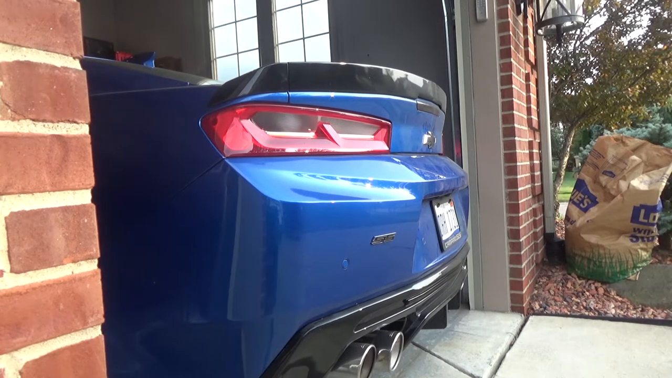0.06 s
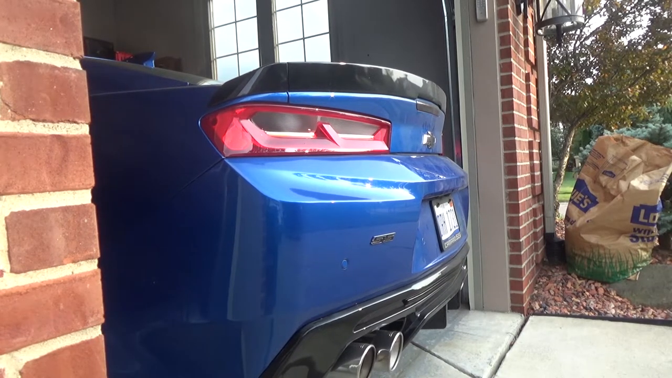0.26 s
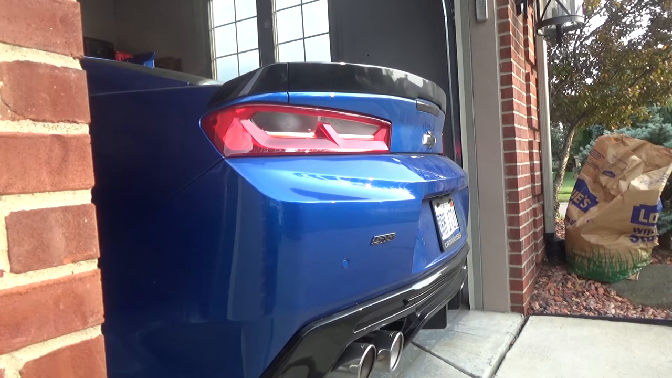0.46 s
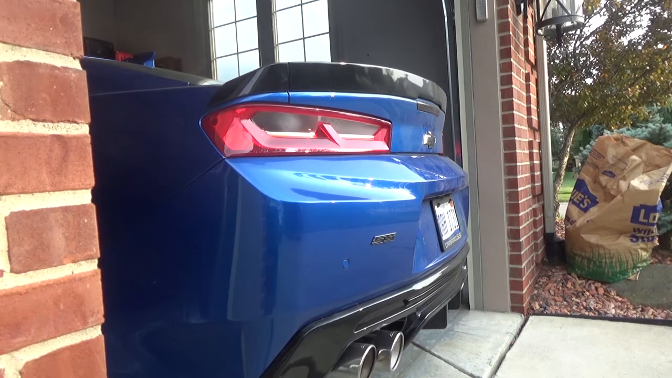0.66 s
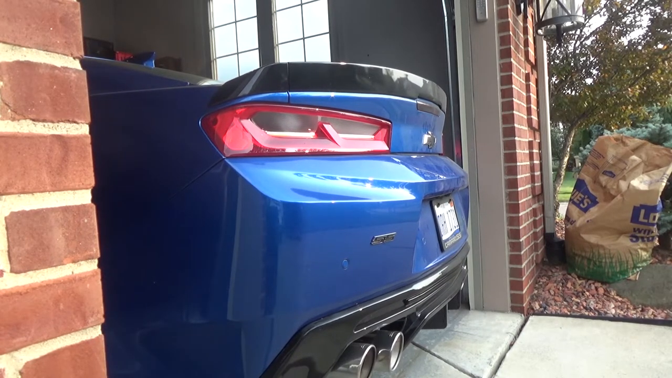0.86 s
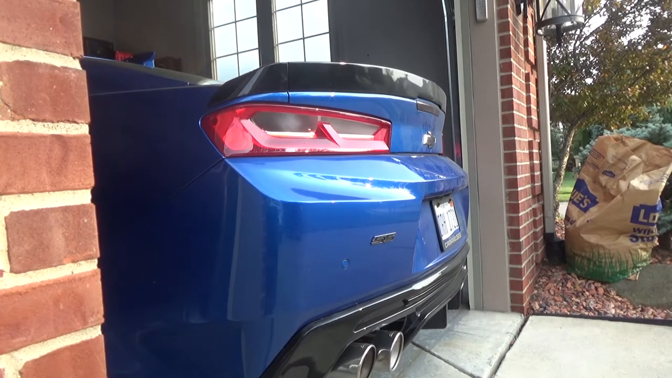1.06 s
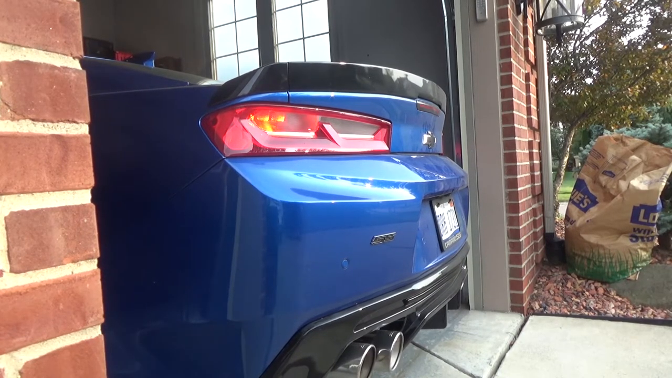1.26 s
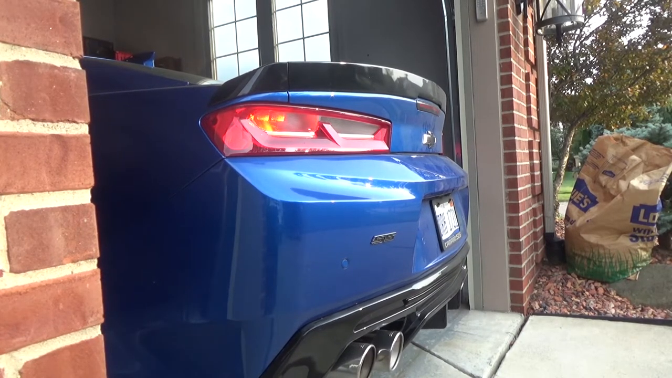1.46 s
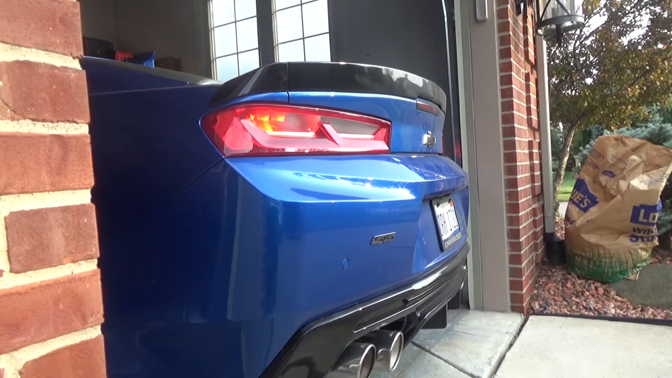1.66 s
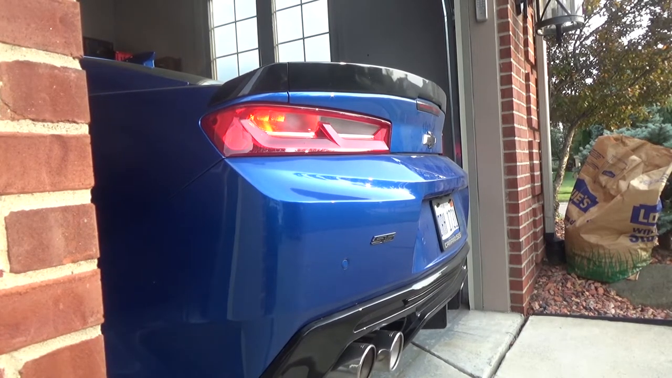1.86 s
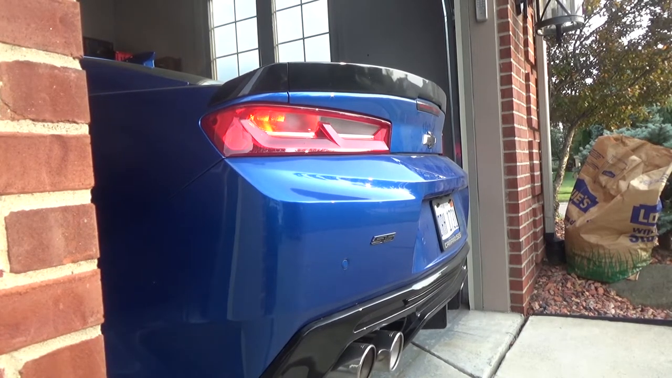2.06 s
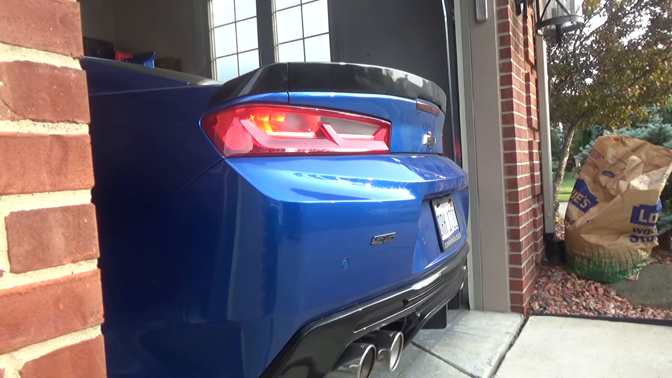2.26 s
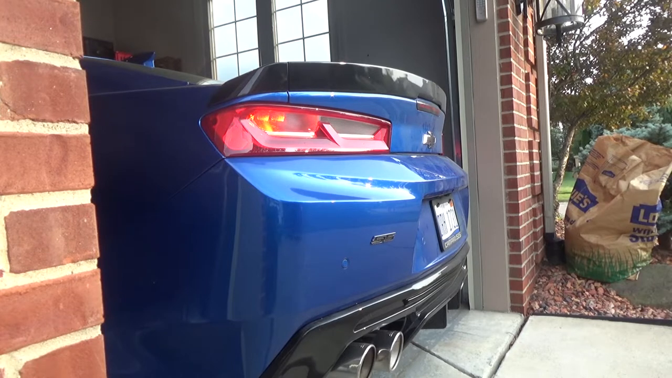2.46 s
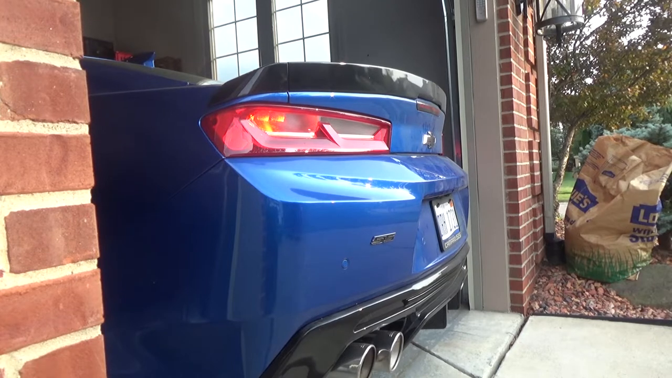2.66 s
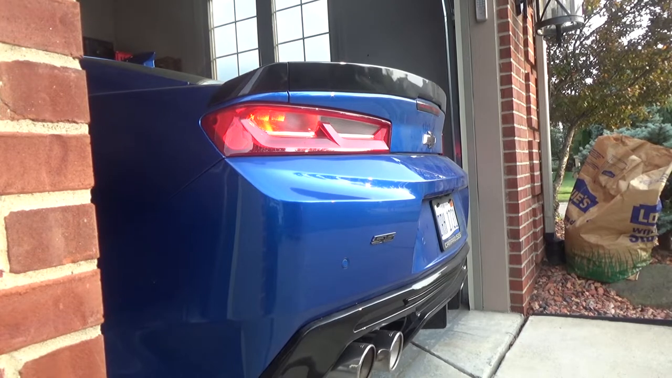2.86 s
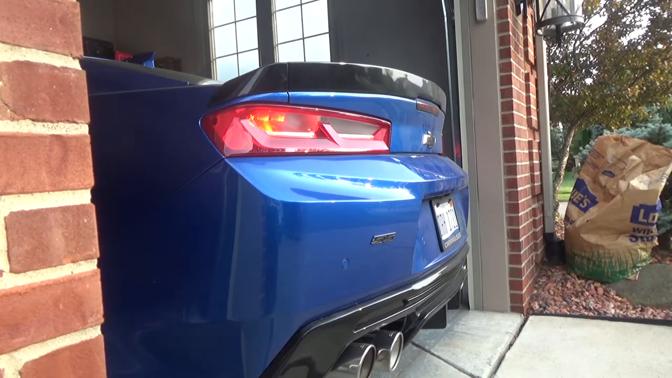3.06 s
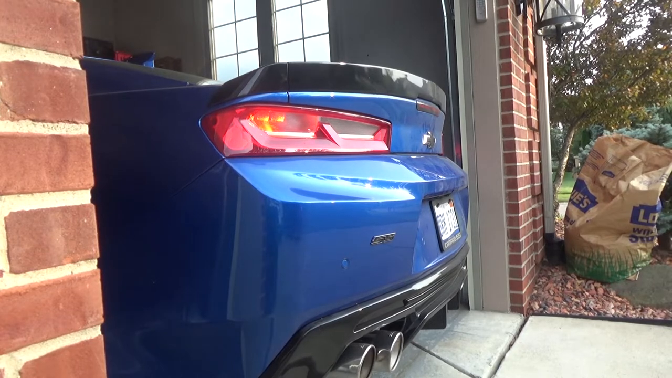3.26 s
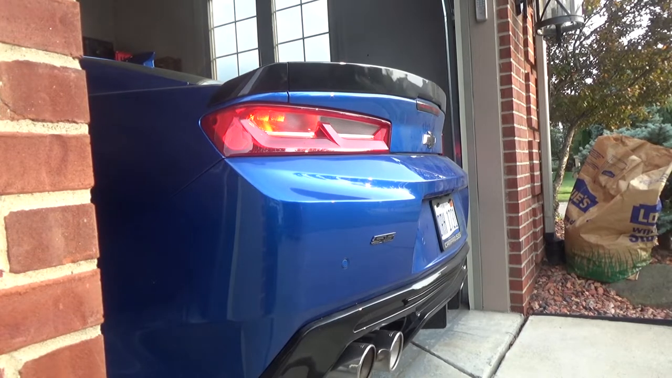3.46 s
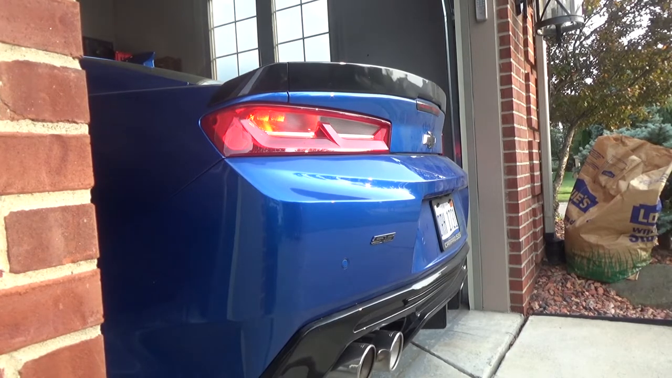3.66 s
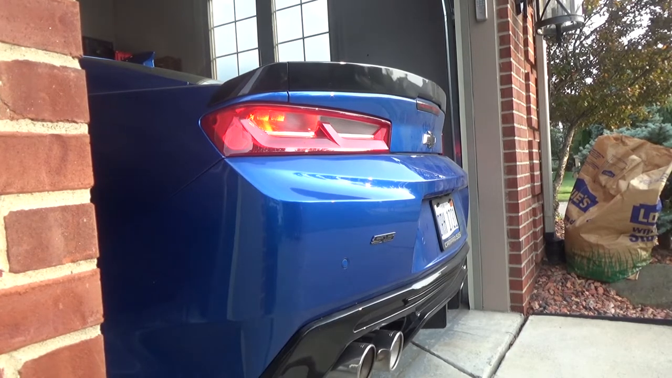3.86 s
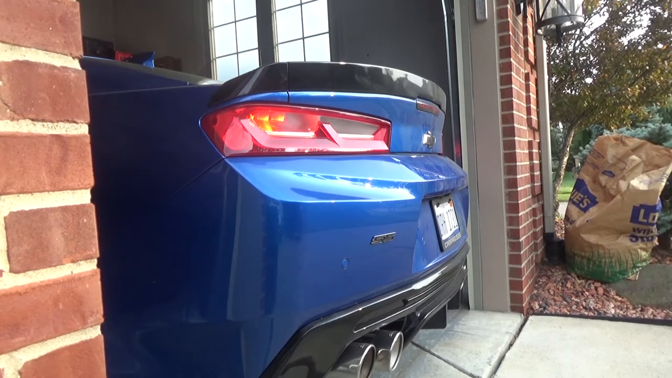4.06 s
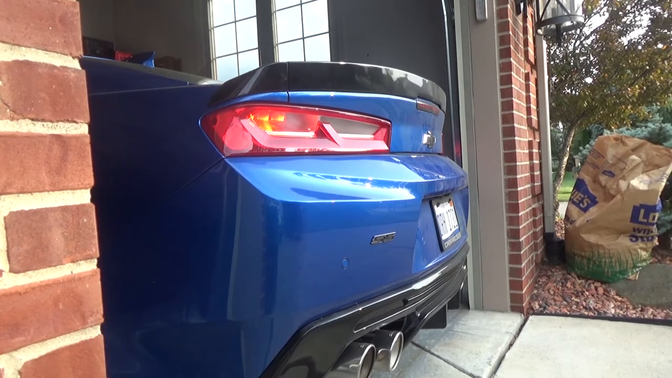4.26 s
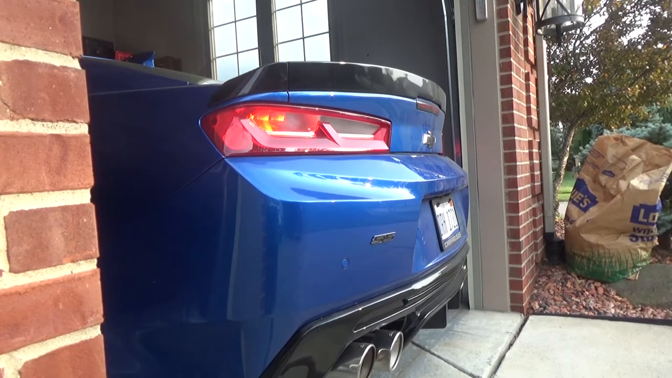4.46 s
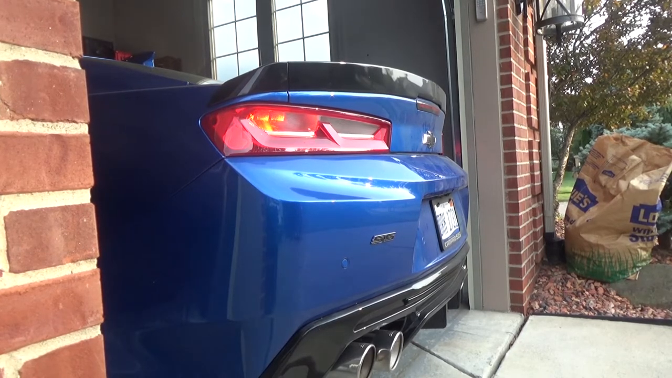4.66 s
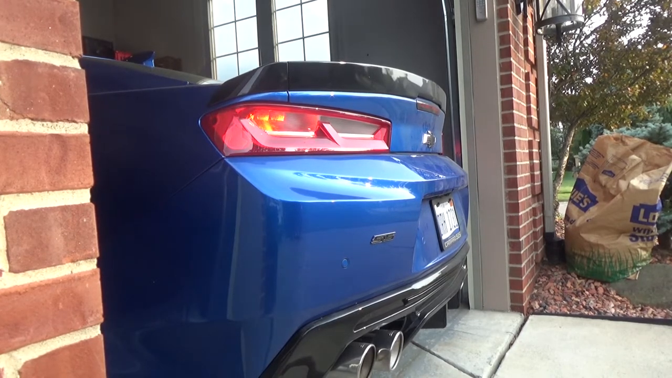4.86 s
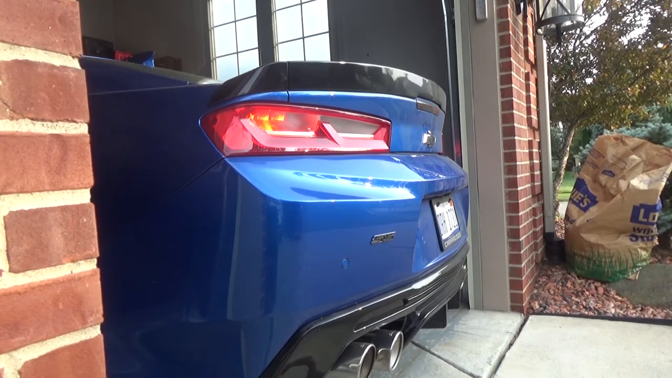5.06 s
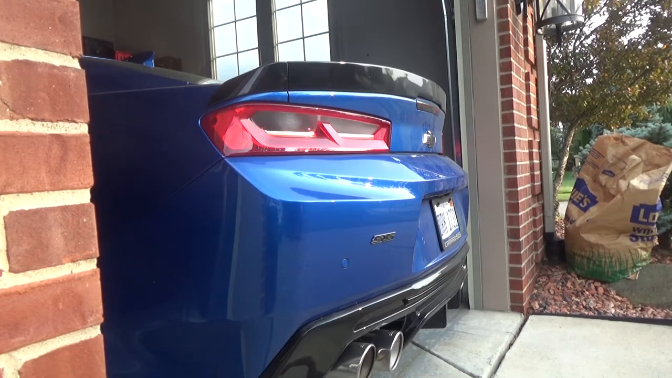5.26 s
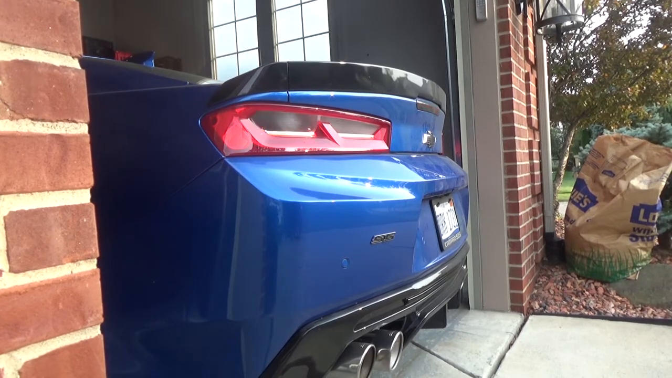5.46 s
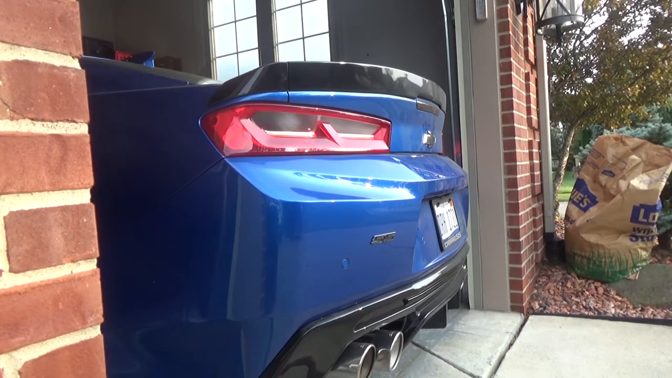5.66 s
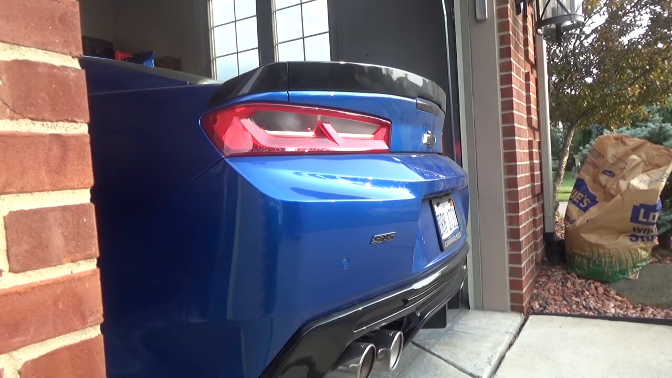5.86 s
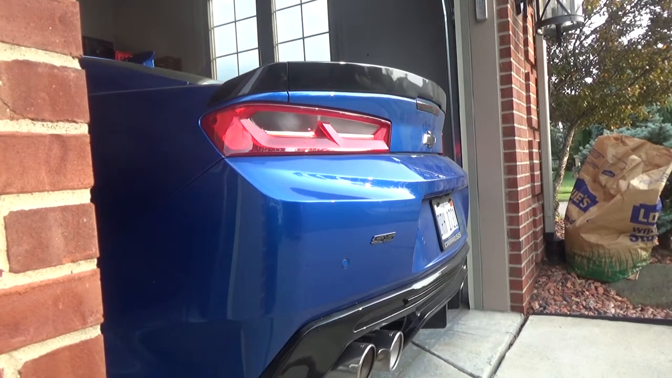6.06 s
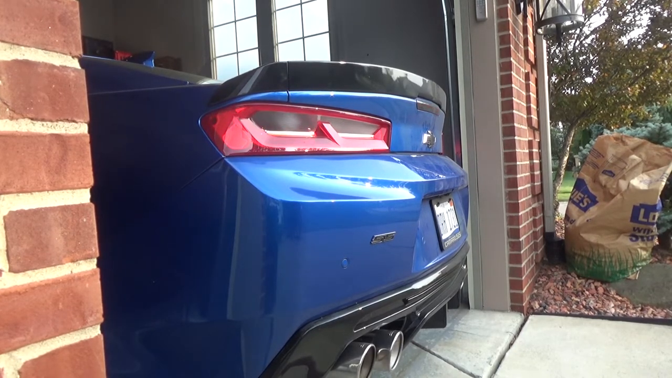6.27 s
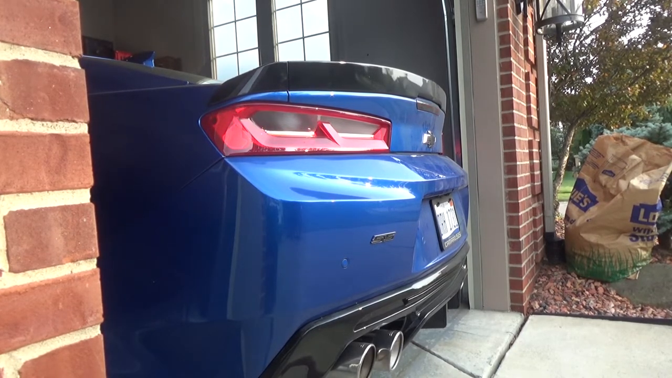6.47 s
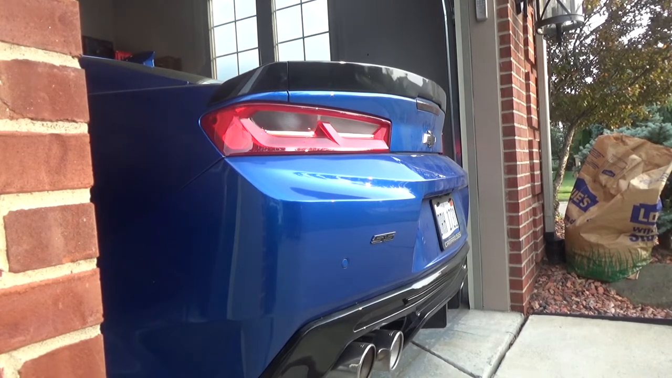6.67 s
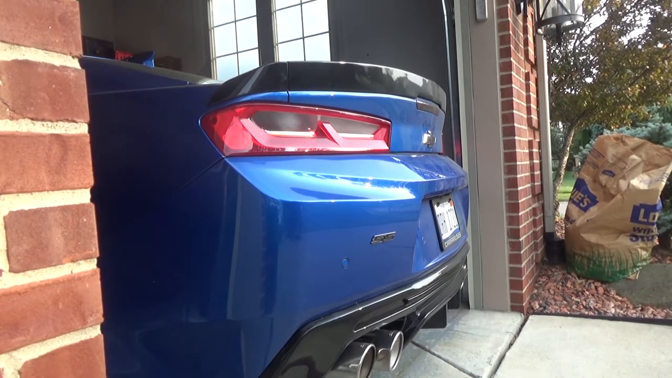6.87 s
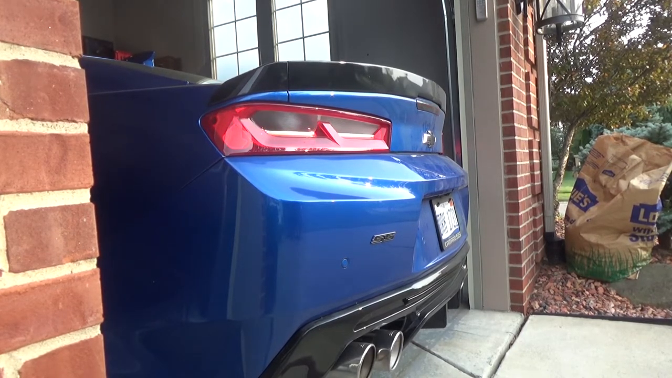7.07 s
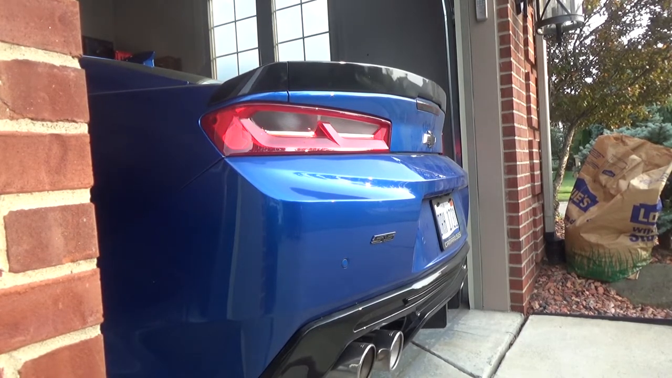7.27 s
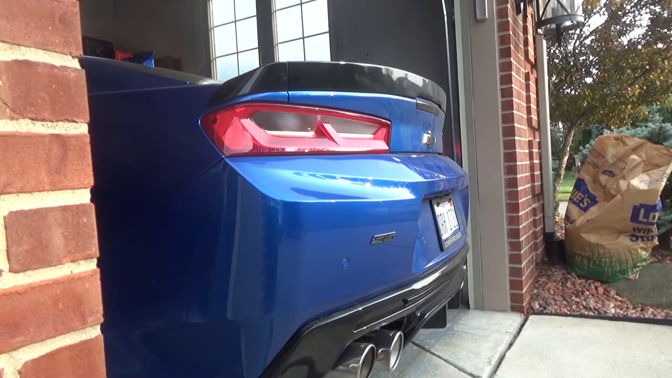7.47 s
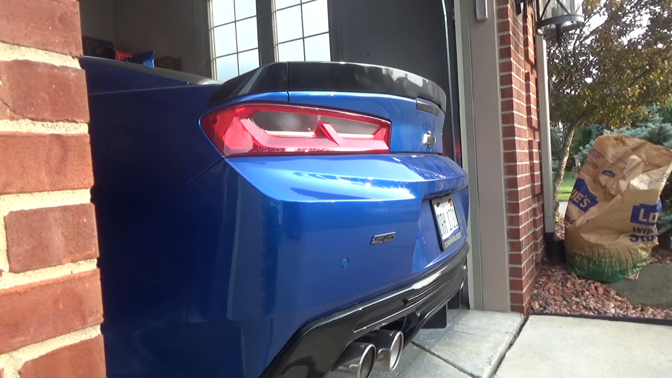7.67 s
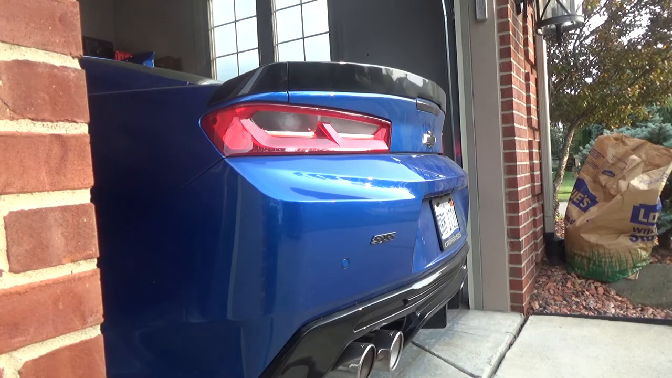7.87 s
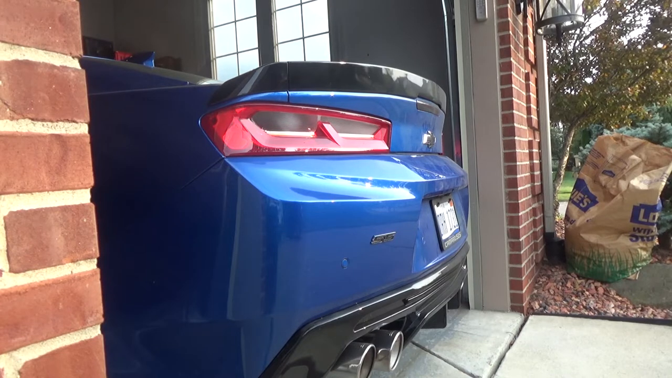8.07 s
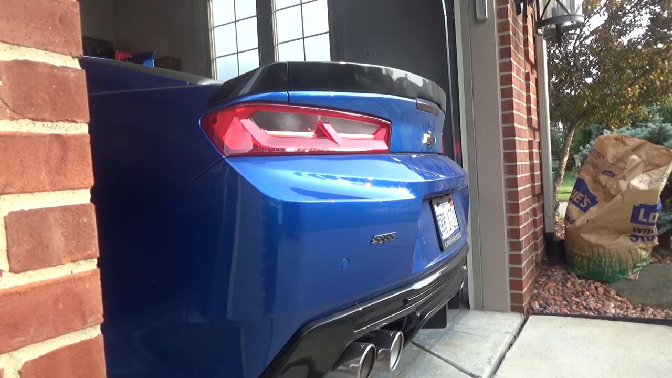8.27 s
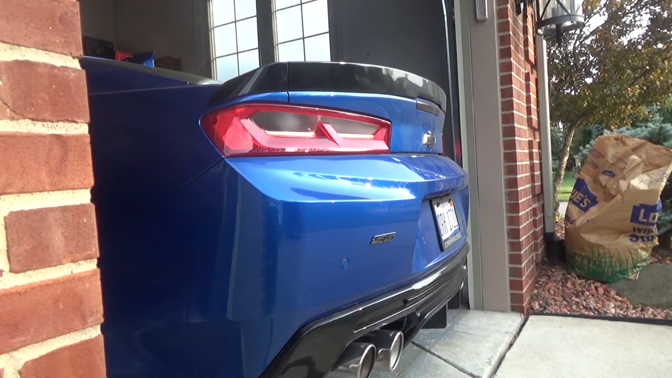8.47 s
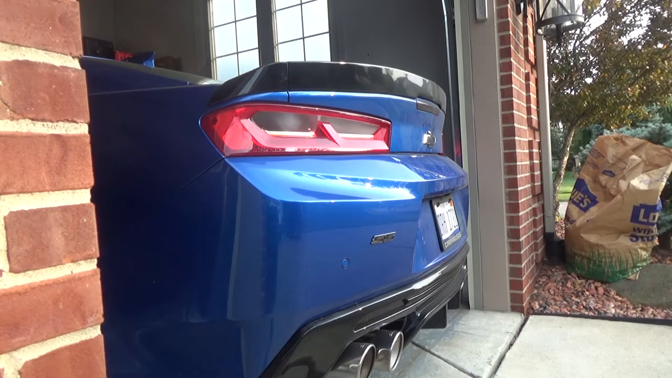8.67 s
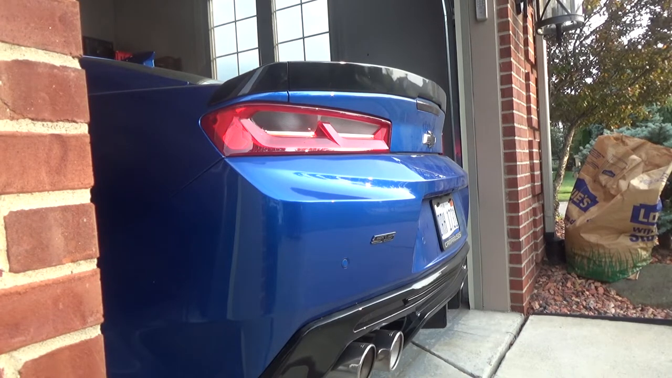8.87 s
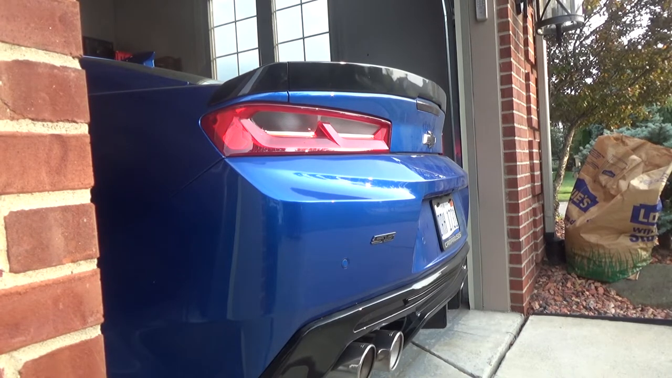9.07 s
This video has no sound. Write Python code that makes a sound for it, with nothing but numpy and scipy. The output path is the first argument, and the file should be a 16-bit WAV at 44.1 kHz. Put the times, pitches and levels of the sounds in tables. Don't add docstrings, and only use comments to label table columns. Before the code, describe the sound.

Quiet insect-filled yard, sharp bodywork thump, brief laboured cranking, then a loud eight-cylinder exhaust flare settling to a deep uneven burble.

```python
import sys
import numpy as np
from scipy import signal
from scipy.fft import rfft, irfft, next_fast_len
from scipy.io import wavfile
from scipy.ndimage import uniform_filter1d

SR = 44100
rng = np.random.default_rng(int(sys.argv[2]) if len(sys.argv) > 2 else 0)


def volts_from_db(level):
    exponent = np.asarray(level, float) / 20
    return 10 ** exponent


def log_audio(samples):
    frames = np.atleast_2d(samples).T
    limited = np.clip(frames, -1, 1)
    pcm = np.round(limited * 32767).astype(np.int16)
    wavfile.write(sys.argv[1], SR, pcm)


N = 401751
TIME = np.arange(N) / SR

# (time [s], gain [dB])
CAMERA = [(0, 3), (1.96, 3.5), (2.77, 6), (2.95, -43), (3.9, -11), (4.04, -8.5), (5.1, -4.5), (9.11, -2.5)]

# (frequency [Hz], level [dB per Hz])
YARD = [(15, -43), (25, -4.5), (119, 1.5), (274, -8.5), (359, -15.5), (457, -13.5), (631, -18), (1170, -20),
        (1750, -24.5), (6210, -36), (7300, -14.5), (9050, -29.5), (15500, -77)]
# (frequency [Hz], correlation [0-1])
YARD_LIKENESS = [(60, 1.0), (240, 1), (950, 0.72), (3770, 0.45), (15000, 1)]
# (time [s], level [dB])
CHIRPS = [
    (0.293, -49.5),
    (0.798, -49.5),
    (1.226, -48.5),
    (6.497, -57),
    (7.73, -63),
    (8.26, -57.5),
    (8.72, -58.5),
]

# (time [s], push [dB], panel [dB], crack [dB], tick [dB])
THUMPS = [
    (0.146, -62, -47, -58, -59),
    (1.363, -38, -21.5, -61, -60),
    (1.38, -33, -16.5, -29, -49),
    (1.394, -18.5, -18, -38, -40),
    (1.419, -22, -40, -62, -42),
    (1.426, -14, -50, -50, -32),
    (1.444, -47, -62, -68, -60),
    (1.486, -45, -34, -36.5, -33.5),
    (1.817, -58, -42, -48.5, -50),
]
# (frequency [Hz], width [Hz], level [dB])
PANEL = [(190, 32, -15), (405, 120, 5.5), (1010, 8.6, -10), (1205, 140, -3.5), (1412, 39, -4),
         (2820, 36, -32)]
# (frequency [Hz], level [dB], t60 [s])
LATCH = [(2610, -9., .55), (2480, -13., .5), (3120, 1., .09), (3600, -3., .07)]
# (frequency [Hz], width [Hz], level [dB])
WHIRR = [(3000, 700, -4), (4350, 300, 0)]

# (time [s], low level [dB], high level [dB])
STROKES = [
    (1.992, -24.5, -25.5),
    (2.308, -25.5, -42),
    (2.476, -23.5, -38),
    (2.602, -21, -33),
    (2.712, -24.5, -30),
]
# (time [s], level [dB])
HEAVE = [
    (2.296, -32),
    (2.795, -17.5),
]
# (frequency [Hz], level [dB per Hz])
GRIND = [(88, -49), (150, -11), (230, 0), (290, 2.5), (766, 0), (1130, 4), (2450, -12), (7560, -15),
         (10300, -17), (15500, -45)]
# (frequency [Hz], width [Hz], level [dB])
GEARS = [(234, 37, -1), (480, 67, 6.5), (1100, 59, -6), (1460, 88, 0.5)]
# (frequency [Hz], width [Hz], level [dB])
WHINE = [(1130, 45, -17), (2230, 50, -24), (2800, 140, -27), (3650, 220, -30), (4700, 240, -30)]
# (time [s], level [dB], t60 [s])
CHUFFS = [(1.979, -26, 0.2), (2.2694, -24.5, 0.19), (2.458, -14.5, 0.18), (2.5864, -13.5, 0.18),
          (2.7042, -16, 0.2), (2.814, -14.5, 0.19), (2.848, -18.5, 0.25), (2.9344, -18.5, 0.2),
          (3.0494, -21.5, 0.12), (3.1328, -22.5, 0.11), (3.1772, -23, 0.13), (3.2294, -28, 0.089),
          (3.891, -29.5, 0.26)]

# (time [s], rate [firings per s])
SPEED = [(2.78, 66.0), (2.9, 74.0), (3.1, 92.0), (3.2, 95.2), (3.3, 91.76), (3.6, 81.83), (3.8, 76.13),
         (4.0, 73.48), (4.6, 66.6), (5.2, 61.4), (5.6, 58.1), (6.0, 56.3), (6.35, 54.1), (7.0, 52.7),
         (7.6, 51.6), (7.9, 52.0), (8.2, 51.3), (9.11, 50.8)]
# (time [s], lead [firings])
FIRING_LEAD = [(3.3, 0), (3.6, -.12), (4.15, -.1), (4.4, 0), (4.8, -.01), (5.1, .04), (6.6, .07), (6.8, .12),
               (7.3, .09), (8., .07), (8.6, .11), (9.11, .18)]
# (time [s], opening [0-1])
THROTTLE = [(2.78, 0.6), (2.9, 0.95), (3.2, 0.71), (3.32, 0.29), (3.8, 0.), (5.4, 0.21), (6.4, 0.2),
            (9.11, 0.07)]
# (pipe delay [ms], push [dB], muffler [dB], low rasp [dB], high rasp [dB], ping [dB])
CYLINDERS = [(12.67, 4, -0.5, 2, 1, 9), (16.67, -5.5, 1.5, 0.5, 4, 10), (12.97, 1.0, -4.5, 4, -2, 10),
             (11.29, 4, 0, -3, 2, 2), (12.65, -1.5, 2.5, -3, 6, -4), (12.35, -1, 4, 5, 0, 15.5),
             (11.97, 3.5, -1.5, 4.5, 5.5, 4), (12.52, -0.5, -8, -3, -15, 0)]
# (frequency [Hz], level [dB])
FIRST_ORDER = [(51, -14), (54, -16.5), (58, -22), (61, -27), (64, -24.5), (70, -23.5), (82, -30.5),
               (90, -32)]
SECOND_ORDER = [(102, -32), (125, -31), (143, -22.5), (152, -34), (164, -23.5), (180, -27), (190, -22)]
THIRD_ORDER = [(190, -70), (205, -44), (220, -18), (235, -19), (262, -16), (285, -44)]
CANCELLED = [(1, 0.68), (2, 0.88), (3, 0.32), (4, 0.27), (5, 0.074), (6, 0.79), (7, 0.89)]
# (frequency [Hz], width [Hz], level [dB])
PIPE = [(51, 21.5, -4), (141.7, 19.4, -4), (189.5, 16, -4), (207.3, 13, 0), (233.2, 24.3, -1),
        (268, 31, -5.5), (316.7, 29, -6)]
# (frequency [Hz], width [Hz], level [dB])
MUFFLER = [(369.5, 18, -3), (411, 16.6, -14.5)]
# (frequency [Hz], width [Hz], level [dB])
TIPS = [(452, 138, -1.5), (606, 58, -3), (685.7, 45.7, 8), (844, 152, -3), (1015, 99, -4.5),
        (1185, 81.5, 2), (1472, 121, -8.5), (1723, 21, -16.5)]
# (time [s], level [dB])
LOW_CRACKS = [(4.174, -25), (4.619, -19), (4.777, -13), (5.025, -21), (5.072, -18), (5.153, -28),
              (5.203, -20), (5.284, -25), (5.354, -24), (5.417, -21), (5.485, -23), (5.604, -16),
              (5.758, -21), (5.798, -21), (5.883, -18), (6.024, -23), (6.405, -23), (6.555, -22.5),
              (6.61, -28), (6.911, -24), (7.159, -28), (7.68, -21), (7.834, -22), (7.929, -28),
              (7.987, -25), (8.143, -19), (8.298, -23), (8.455, -22), (8.611, -21), (9.08, -20)]
HIGH_CRACKS = [(3.7819, -24), (4.0665, -22), (4.5212, -30), (4.594, -21), (4.838, -33), (4.9323, -23),
               (5.2216, -17.5), (5.3189, -18), (5.4362, -17), (5.5868, -31), (5.71, -19), (5.8662, -19),
               (6.1311, -18), (6.225, -24), (6.2832, -23), (6.372, -20), (6.4457, -16.5), (6.537, -22),
               (6.819, -22), (6.8944, -19), (7.0823, -19), (7.3518, -22), (7.489, -17), (7.8172, -15),
               (7.8532, -17), (7.893, -16), (8.0064, -24), (8.123, -28), (8.1626, -21), (8.2796, -23),
               (8.3176, -27), (8.359, -22), (8.475, -19), (8.5351, -23), (8.5925, -26), (8.6295, -17),
               (8.7274, -28), (8.79, -18), (8.905, -10), (8.942, -22.5)]
# (frequency [Hz], width [Hz], level [dB])
SHIELDS = [(1760, 250, 11.5), (2328, 59, 5), (2740, 250, 0), (3170, 140, -15)]
# (frequency [Hz], level [dB per Hz])
BAY_HISS = [(1000, -28), (1700, -4), (2100, -6), (2850, -12.5), (3840, -16.5), (6260, -18), (7330, -19.5),
            (9940, -16.5), (15500, -39)]

# (frequency [Hz], left over right [dB])
LEAN = [(60, 1), (180, 3.3), (550, 2.3), (1300, 2.2), (2400, .5), (4970, 1.8), (9000, .3), (15000, 0)]
# (frequency [Hz], left lead [rad])
LEAD = [(0, -0.64), (260, 0.76), (1640, -0.53), (6800, 0.35), (7320, 0.0), (15200, -0.0)]
# (frequency [Hz], t60 [s])
GARAGE = [(100, 0.54), (400, 0.75), (1500, 0.59), (6000, 0.17)]

CRANK_S = (1.964, 2.795)


def evened(x):
    return x / np.sqrt(np.mean(x ** 2) + 1e-20)


def steadied(x, span=0.21):
    slow = abs(uniform_filter1d(x ** 2, int(span * SR)))
    return x / np.sqrt(slow + 1e-9 * np.mean(x ** 2))


def noise():
    return rng.standard_normal(N)


def read(points, hz):
    f, value = np.transpose(points)
    return np.interp(np.log(hz + 1), np.log(f + 1), value)


def columns(rows, fade=0.0035):
    s, *values = np.transpose(rows)
    gate = np.clip(np.minimum(TIME - s[0], s[-1] + fade - TIME) / fade, 0, 1)
    return [np.interp(TIME, s, v) for v in values] + [gate]


def coloured(x, gain):
    size = next_fast_len(x.shape[-1], True)
    hz = np.fft.rfftfreq(size, 1 / SR)
    return irfft(rfft(x, size) * gain(hz), size)[..., :x.shape[-1]]


def resonate(x, hz, width):
    r = np.exp(-np.pi * width / SR)
    if np.ndim(hz) == 0:
        pole = r * np.exp(2j * np.pi * hz / SR)
        return 2 * signal.lfilter([1 - r], [1, -pole], x).real
    turn = np.exp(2j * np.pi * np.cumsum(hz) / SR)
    return 2 * (turn * signal.lfilter([1 - r], [1, -r], x * turn.conj())).real


def band(x, hz, width):
    return resonate(resonate(x, hz, width), hz, width)


def body(x, modes):
    out = 0
    for k, (hz, width, db) in enumerate(modes):
        mode = resonate(resonate(x, hz, 1.63 * width), hz, 1.64 * width)
        out = out + (-1) ** k * volts_from_db(db) * mode
    return out


def decay(x, t60):
    return signal.lfilter([1], [1, -np.exp(-np.log(1000) / (t60 * SR))], x)


def surges(rows, column, rise, fall, rest_db):
    power = volts_from_db(2 * rest_db)
    for row in rows:
        drop_db = np.maximum(rise * (row[0] - TIME), fall * (TIME - row[0]))
        power = power + volts_from_db(2 * (row[column] - drop_db))
    return np.sqrt(power)


def trill():
    hz = 7340 + 8.1 * TIME
    waver = evened(uniform_filter1d(noise(), size=20000))
    stroke = (np.cumsum(54 * (1 + 0.0407 * waver)) / SR) % 1
    pulses = np.sin(np.pi * stroke) ** 3 + 0.13
    scrape, *sides = rng.standard_normal((3, N))
    tone = np.sin(2 * np.pi * np.cumsum(hz + 250 * (.5 - stroke)) / SR)
    near = evened(pulses * (tone + 0.83 * evened(band(scrape, hz, 500))))
    near += 0.037 * evened(band(scrape, 2 * hz, 900))
    sway = 1 + .5 * np.sin(2 * np.pi * 2.9 * TIME + 3.2)
    climb_hz = 8000 + 600 * ((2.4 * TIME + .3) % 1) ** 2
    far = np.array([evened(band(n, climb_hz, 500)) for n in sides]) * sway
    wide = np.array([evened(band(n, hz, 380)) for n in sides])
    lean = volts_from_db(np.array([[.5], [-1.5]]))
    return volts_from_db(-50 + columns(CAMERA)[0]) * (near * lean + 0.28 * far + 0.73 * wide)


def yard():
    frames, hz = N // 256 + 5, np.fft.rfftfreq(1024, 1 / SR)
    a, b, c, d, patches = rng.standard_normal((frames, 513, 5)).T
    patches = evened(uniform_filter1d(uniform_filter1d(patches, 12, 0), 14, 1))
    same = np.clip(read(YARD_LIKENESS, hz), -1, 1)[:, None]
    left, other = a + 1j * b, c + 1j * d
    z = np.array([left, same * left + np.sqrt(1 - same ** 2) * other])
    z *= volts_from_db(read(YARD, hz)[:, None] + 0.87 * patches)
    sound = signal.istft(z, nperseg=1024, noverlap=768)[1][:, :N]
    wake_db = 0.5 * np.clip((TIME - 1.06) / .2, 0, 1)
    return volts_from_db(-44.5 + wake_db + columns(CAMERA)[0]) * evened(sound)


def thumps():
    raw = rng.standard_normal((4, N))
    push = evened(band(raw[0], 137, 280))
    boom = resonate(resonate(raw[1], 750, 930), 670, 930)
    panel = evened(body(raw[1], PANEL) + 0.27 * boom)
    crack = band(raw[2], 2100, 2800)
    crack = evened(crack + 0.48 * resonate(raw[2], 2440, 150) + 0.37 * resonate(raw[2], 2660, 250))
    tick = evened(band(raw[3], 8400, 6500))
    out, age = np.zeros(N), TIME[:SR // 2]
    for s, push_db, panel_db, crack_db, tick_db in THUMPS:
        at = slice(round(s * SR), round(s * SR) + SR // 2)
        layers = (  # noise, dB, rise s, t60 s
            (push, push_db, .012, .3), (panel, panel_db, .004, .2),
            (crack, crack_db, .002, .34), (tick, tick_db, .002, .12))
        for x, db, rise, t60 in layers:
            out[at] += x[at] * volts_from_db(db - 60 * age / t60) * np.minimum(age / rise, 1)
        for hz, db, t60 in LATCH:
            struck_hz = hz * rng.uniform(1.0, 1.015)
            out[at] += volts_from_db(crack_db + db - 60 * age / t60) * np.sin(2 * np.pi * struck_hz * age)
    return out


def chirps():
    out, length_s, fade_s = np.zeros(N), .135, .038
    for s, db in CHIRPS:
        age = np.clip(TIME - s, 0, 1)
        stroke = (age * 21.7) % 1
        hz = 4810 + 40 - 250 * np.exp(-age / 0.015) - 200 * stroke ** 4
        phase = 2 * np.pi * np.cumsum(hz) / SR
        swell = np.minimum(age / length_s, 1) ** 0.37
        swell *= np.exp(-np.maximum(age - 0.78 * length_s, 0) / fade_s)
        tone = np.sin(phase) + .35 * np.sin(.945 * phase) + 0.18 * np.sin(2 * phase)
        out += volts_from_db(db) * swell * (.5 + np.sin(np.pi * stroke)) * tone
    blur = 1 + .33 * evened(resonate(noise(), 70, 160))
    return out * blur * volts_from_db(np.array([[2.5], [-2.5]]))


def whirr():
    swell = np.clip((TIME - 1.2) / 0.045, 0, 1) * (TIME < THUMPS[2][0])
    return volts_from_db(-61) * swell * evened(body(noise(), WHIRR))


def starter():
    engaged, released = CRANK_S
    on = np.clip(np.minimum((TIME - engaged) / 0.04, (released - TIME) / 0.0032), 0, 1)
    spin_db, rest_db = -28 - 11 * (TIME - engaged), -48
    effort = surges(STROKES, column=1, rise=384, fall=167, rest_db=spin_db)
    bright = surges(STROKES, column=2, rise=384, fall=167, rest_db=-36.5)
    rocking = surges(HEAVE, column=1, rise=900, fall=77, rest_db=rest_db)
    teeth = (rng.random(N) < 2500 / SR) * volts_from_db(1.8 * rng.exponential(1, N)) * noise()
    drive = evened(teeth) * .5 + noise()
    grind = evened(coloured(drive, lambda hz: volts_from_db(read(GRIND, hz))))
    grind += 0.63 * evened(body(drive, GEARS))
    effort_db = np.maximum(20 * np.log10(effort), -45)
    speed = 1 - 0.007 * (uniform_filter1d(effort_db, 2500) + 28)
    for hz, width, db in WHINE:
        patchy_db = 5 * evened(uniform_filter1d(noise(), 3500))
        grind += volts_from_db(db + patchy_db) * evened(band(drive, hz * speed, width))
    low = coloured(grind, lambda hz: 1 / np.sqrt(1 + (hz / 1800) ** 8))
    heave = evened(resonate(resonate(noise(), 50, 40), 51, 40))
    rocking = (TIME > engaged) * (rocking - volts_from_db(rest_db) * (1 - on))
    return on * (effort * evened(low) + bright * evened(grind - low)) + rocking * heave


def chuffs():
    flow = 0
    for s, db, t60 in CHUFFS:
        burst = volts_from_db(db - 18 - 60 * np.maximum(TIME - s, 0) / t60)
        flow = flow + burst * np.clip((TIME - s) / 0.0014, 0, 1)
    air = evened(coloured(noise(), lambda hz: volts_from_db(read(GRIND, hz)) * np.clip(hz / 2500, 0, 1) ** 3))
    whistle = (TIME < CRANK_S[1]) * evened(band(noise(), 14100, 150))
    return flow * (air + 0.096 * whistle)


def firings(turns, db, late_ms, scatter_db, jitter_ms):
    at = np.flatnonzero(np.diff(np.floor(turns)) > 0) + 1
    which = turns[at].astype(int) % len(CYLINDERS)
    chance = rng.standard_normal((len(at), 2))
    late = (late_ms[which] + jitter_ms * chance[:, 0]) * SR / 1000
    train = np.zeros(N)
    train[np.clip(at + late.astype(int), 0, N - 1)] = volts_from_db(db[which] + scatter_db * chance[:, 1])
    return train


def firing_tones(rate, turns):
    pulling = (np.gradient(rate) > 0) * (rate > 65)
    load = uniform_filter1d(pulling * 1., 4000)
    lumpy = 1 + .6 * evened(uniform_filter1d(uniform_filter1d(noise(), 900), 900))
    tones = volts_from_db(read(FIRST_ORDER, rate)) * np.cos(2 * np.pi * (turns - .01))
    tones += volts_from_db(read(SECOND_ORDER, 2 * rate) - 12 * load) * np.sin(4 * np.pi * turns - 0.9)
    third = volts_from_db(read(THIRD_ORDER, 3 * rate) - 40 * load - 2.5)
    tones += third * np.cos(6 * np.pi * turns) * lumpy
    return np.sqrt(2) * tones


def pipe_growl(rate, turns, throttle, age):
    pipe_ms, push_db, muffler_db = np.transpose(CYLINDERS)[:3]
    pushes = firings(turns, push_db, pipe_ms, scatter_db=1, jitter_ms=.09)
    for order, share in CANCELLED:
        pushes -= share * resonate(pushes, order * rate, 9.4)
    branch = volts_from_db(muffler_db[np.floor(turns - .4).astype(int) % len(CYLINDERS)])
    growl = steadied(body(pushes, PIPE) + volts_from_db(10.8 * throttle) * body(pushes * branch, MUFFLER))
    growl *= volts_from_db(-19 + 4 * throttle) * np.minimum(.3 + age / .03, 1)
    bang = evened(body(noise(), [*PIPE[1:], *MUFFLER]))
    return growl + volts_from_db(-14 - 60 * age / 0.41) * bang


def tip_rasp(turns, throttle, age, valve_ms):
    low_db, high_db = np.transpose(CYLINDERS)[3:5]
    rasp, swirl = 0, noise()
    for puff_db, cracks, tips in ((low_db, LOW_CRACKS, TIPS[:4]), (high_db, HIGH_CRACKS, TIPS[4:])):
        pops = firings(turns, puff_db, valve_ms, scatter_db=.8, jitter_ms=0.25)
        s, db = np.transpose(cracks)
        pops[(s * SR).astype(int)] += volts_from_db(db + 25)
        puffs = decay(pops, 0.063) + 0.27 + 1.3 * throttle
        rasp = rasp + body(puffs * swirl + 15.5 * pops, tips)
    rasp = steadied(rasp)
    roar = coloured(rasp, lambda hz: hz ** 3 / (hz ** 3 + 736 ** 3))
    bang = volts_from_db(-1.5 - 60 * age / 0.079) * roar
    return volts_from_db(-30) * (rasp + (volts_from_db(18 * throttle) - 1) * roar) + bang


def shields_and_bay(turns, throttle, valve_ms):
    ping_db = np.transpose(CYLINDERS)[5]
    knocks = decay(firings(turns, ping_db, valve_ms, scatter_db=2.2, jitter_ms=0.28), 0.029)
    knocks += 0.25 + 0.58 * throttle
    ring = steadied(body(knocks * noise(), SHIELDS))
    hiss = evened(coloured((knocks + 5.2) * noise(), lambda hz: volts_from_db(read(BAY_HISS, hz))))
    return volts_from_db(-56.5 + 28 * throttle) * ring + volts_from_db(-47.5 + 4.5 * throttle) * hiss


def exhaust():
    rate = np.interp(TIME, *np.transpose(SPEED), left=0)
    turns = np.cumsum(rate) / SR + np.interp(TIME, *np.transpose(FIRING_LEAD))
    throttle, on = columns(THROTTLE)
    age = np.maximum(TIME - SPEED[0][0], 0)
    valve_ms = np.full(len(CYLINDERS), 3.)
    tones = firing_tones(rate, turns)
    growl = pipe_growl(rate, turns, throttle, age)
    high = tip_rasp(turns, throttle, age, valve_ms) + shields_and_bay(turns, throttle, valve_ms)
    return on * tones, on * growl, on * high


def placed(x):
    def half(hz):
        return volts_from_db(read(LEAN, hz) / 2) * np.exp(.5j * read(LEAD, hz))
    return np.array([coloured(x, half), coloured(x, lambda hz: 1 / half(hz))])


def garage(x):
    taps = np.zeros((2, SR // 2))
    at = np.arange(300, SR // 2 - 20, 20) + rng.integers(0, 20, (2, (SR // 2 - 301) // 20))
    np.put_along_axis(taps, at, rng.choice([-1., 1.], at.shape), 1)
    taps[1] = 0.8 * taps[0] + .33 * taps[1]
    hz, t, z = signal.stft(taps, SR, nperseg=256)
    fading = volts_from_db(-60 * t / read(GARAGE, hz)[:, None])
    tail = signal.istft(z * fading, SR, nperseg=256)[1]
    return signal.fftconvolve(x[None], tail / np.linalg.norm(tail[0]), axes=1)[:, :N]


def scene():
    outside = trill() + yard() + chirps()
    rattle = thumps() + whirr() + starter() + chuffs()
    tones, growl, high = exhaust()
    room = garage(volts_from_db(-7) * growl + volts_from_db(-11) * high + volts_from_db(-10.5) * rattle)
    return placed(tones + growl + high + rattle) + room + outside


def low_pass(x):
    return signal.sosfilt(signal.butter(12, 15710, fs=SR, output="sos"), x)


def record(dry):
    hiss = evened(coloured(noise(), lambda hz: hz ** 2 / (hz ** 2 + 9000 ** 2)))
    mix = np.tanh(dry + volts_from_db(-64 + columns(CAMERA)[0]) * hiss)
    return low_pass(mix)


dry = scene()
out = record(dry)
log_audio(out)
```